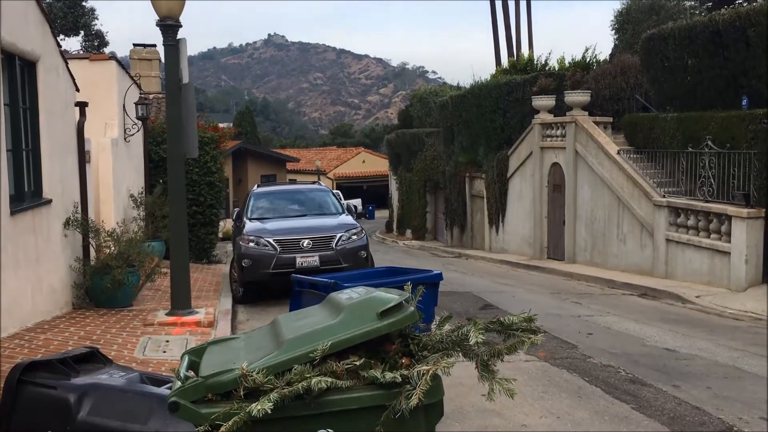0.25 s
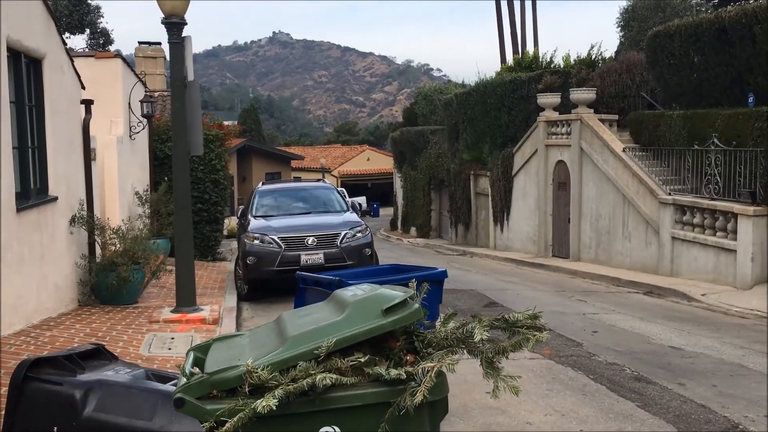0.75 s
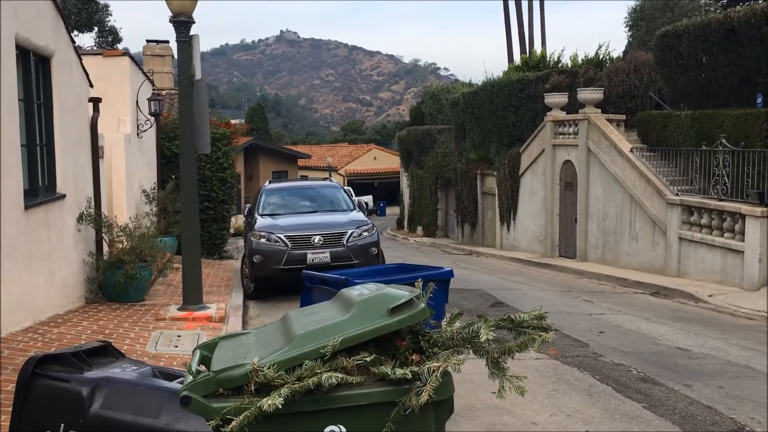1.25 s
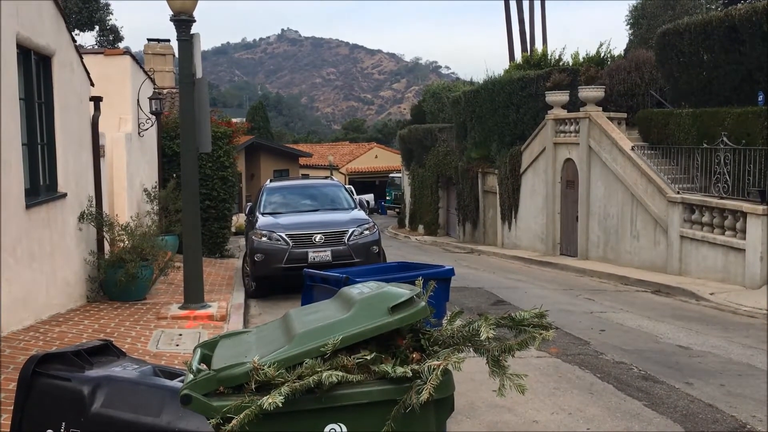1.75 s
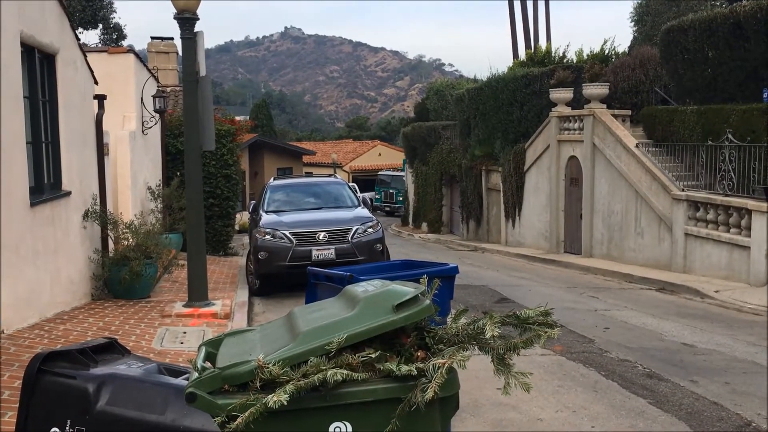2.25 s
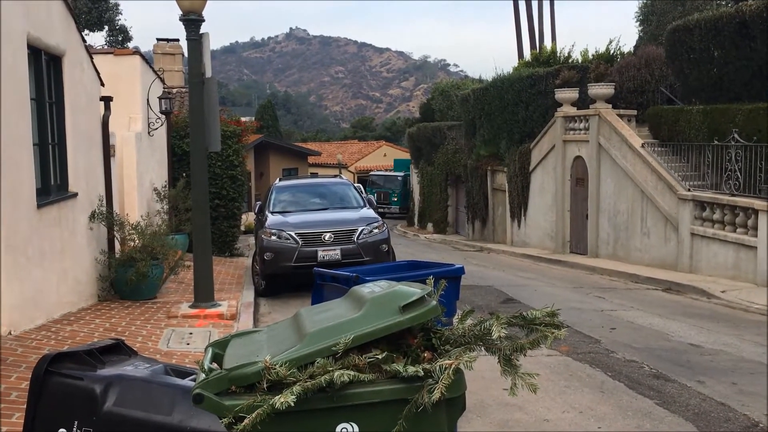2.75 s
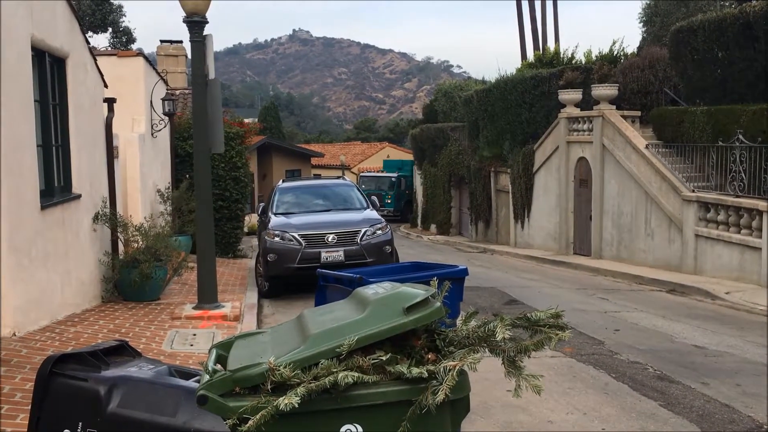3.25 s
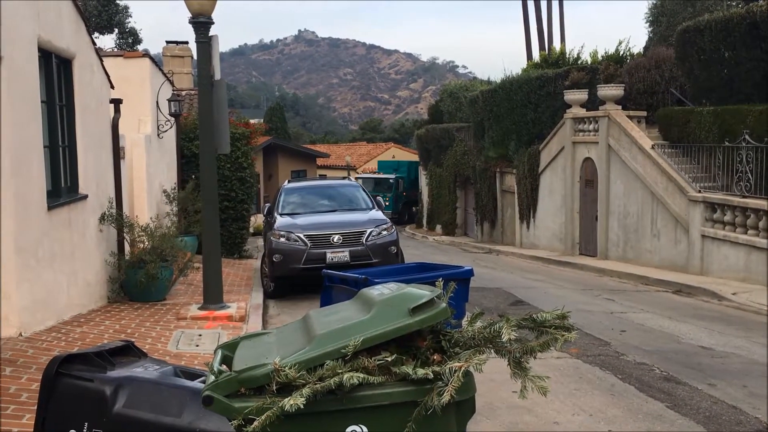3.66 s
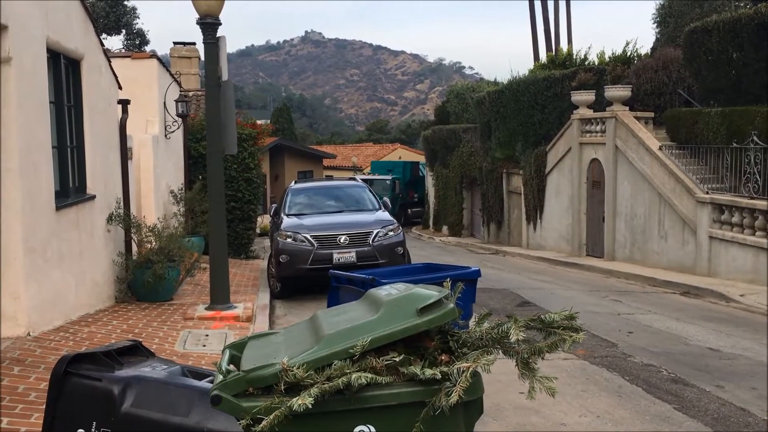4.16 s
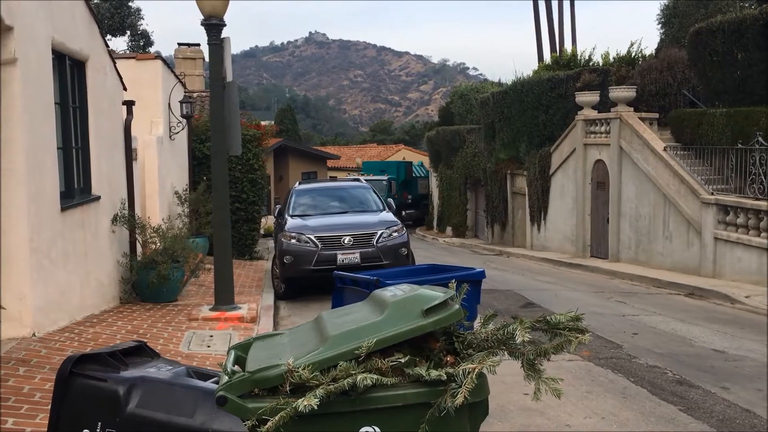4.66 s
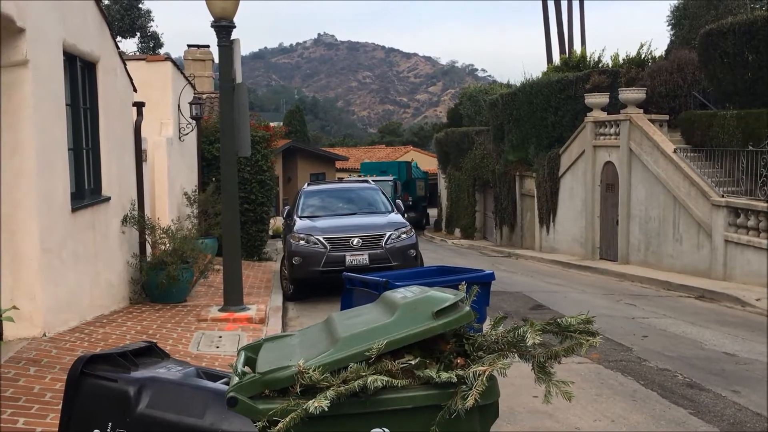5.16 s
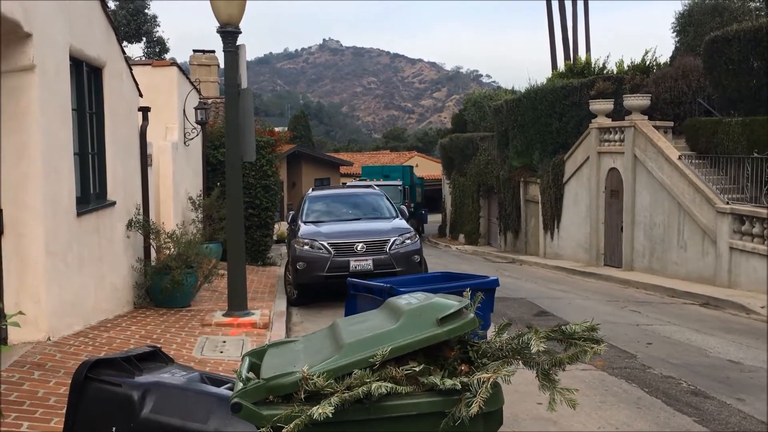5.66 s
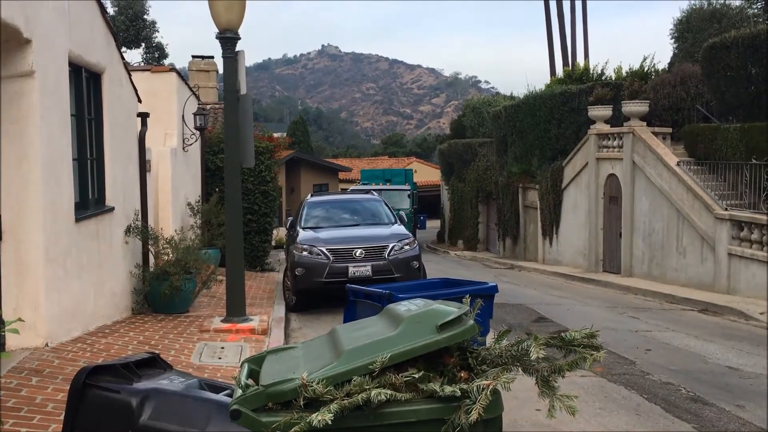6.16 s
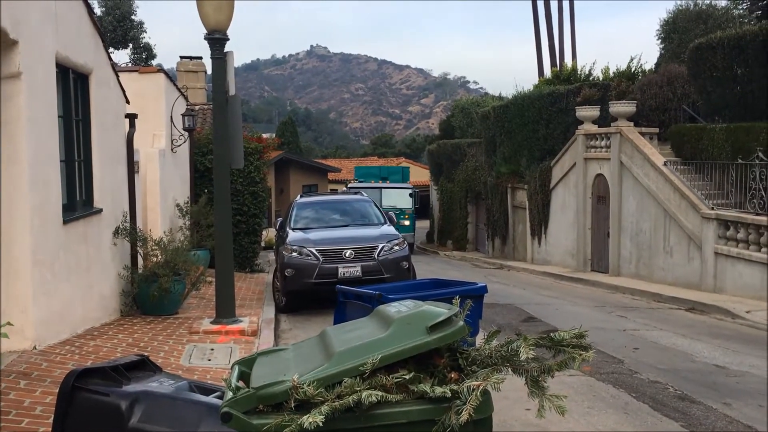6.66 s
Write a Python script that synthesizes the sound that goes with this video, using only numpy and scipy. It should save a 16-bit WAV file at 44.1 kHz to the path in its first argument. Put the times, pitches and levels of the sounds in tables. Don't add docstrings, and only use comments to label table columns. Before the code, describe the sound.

A phone microphone outdoors on a walled residential street picks up a heavy diesel truck coming uphill. From 0 s a low, steady engine drone around 60 Hz rumbles at a distance, with a wavering fan hum and soft airy roar. Dull body knocks land at 0-0.1 s and again near 0.45 s, where a short, thin, falling brake squeak sounds. Around 1.2 s a hollow boom between the walls swells slightly. Until 4 s the drone dips and swells, rising a little in pitch, with faint driveline whistles. At about 4.2 s the throttle opens: pitch climbs quickly to near 80 Hz by 5.4 s, with a very faint air puff at 4.4 s and slight turbo whine. The exhaust booms strongest around 5-6 s, its rapid flutter slowing into heavy throbs. Gear whine, roar and hiss grow as the truck nears, still running when it stops abruptly at 7 s.

```python
import sys
import numpy as np
from scipy import signal
from scipy.fft import rfft, irfft
from scipy.io import wavfile
from scipy.ndimage import uniform_filter1d, map_coordinates

SR = 44100
rng = np.random.default_rng(int(sys.argv[2]) if len(sys.argv) > 2 else 0)


def elevation(decibels):
    levels = np.asarray(decibels, float)
    return 10 ** (levels / 20)


def master_out(mix):
    frames = np.transpose(np.atleast_2d(mix))
    ceiling = np.clip(frames, -1, 1)
    pcm = np.round(ceiling * 32767).astype(np.int16)
    wavfile.write(sys.argv[1], SR, pcm)


N = 304290


def unit(x):
    return x / np.sqrt(np.mean(x ** 2) + 1e-20)


def seconds():
    return np.arange(N) / SR


def curves(rows):
    s, *cols = np.transpose(rows)
    return [np.interp(seconds(), s, c) for c in cols]


def swells(rows):
    t = seconds()
    return sum(db * np.exp(-.5 * ((t - s) / w) ** 2) for s, db, w in rows)


def wobble(rate_hz):
    coarse = np.arange(0, N + 64, 64)
    knots = rng.standard_normal(int(N * rate_hz / SR) + 4)
    return np.interp(np.arange(N), coarse, map_coordinates(knots, [coarse * rate_hz / SR]))


def turns(hz):
    return 2 * np.pi * np.cumsum(hz) / SR


def colour(points):
    f, db = np.transpose(points)
    return lambda hz: elevation(np.interp(np.log(hz + 1), np.log(f + 1), db))


def noise(gain, patchy_db):
    hz, _, z = signal.stft(rng.standard_normal(N + SR), SR, nperseg=2048)
    field = uniform_filter1d(rng.standard_normal(z.shape), size=10, axis=0)
    field = uniform_filter1d(field, size=4, axis=1)
    z = z * elevation(patchy_db * unit(field)) * gain(hz)[:, None]
    x = signal.istft(z, SR, nperseg=2048)[1]
    return unit(x[SR // 2:][:N])


def tone(phase, db, blur_rad, rate_hz, shake_db):
    level = np.sqrt(2) * elevation(db + shake_db * wobble(rate_hz))
    return level * np.cos(phase + blur_rad * wobble(rate_hz))


# (time [s], firing rate [Hz])
FIRING = [(0.0, 60.5), (0.5, 61.13), (1.0, 62.33), (1.5, 61.43), (2.0, 62.9), (2.5, 63.94), (3.5, 66.13),
          (4.0, 66.13), (4.2, 67.67), (4.4, 69.65), (4.6, 73.44), (4.8, 76.1), (5.0, 77.93), (5.4, 79.9),
          (5.8, 80.4), (6.2, 81.7), (6.6, 82.67), (6.9, 82.9)]


def firing_rate():
    return curves(FIRING)[0]


# (time [s], level [dB])
BOOM = [(0, -27.5), (.6, -28.5), (1.1, -28.5), (1.5, -26), (2.0, -30.5), (2.6, -25.5), (2.95, -26),
        (3.3, -29.5), (3.8, -21.5), (4.3, -25), (4.6, -22), (4.85, -18.5), (5.08, -14.5), (5.36, -17.5),
        (6.02, -14.5), (6.43, -20.5), (6.6, -17), (6.9, -20.5)]
# (time [s], rate [Hz])
FLUTTER = [(4.2, 54.97), (4.6, 48.51), (5.05, 32.74), (5.3, 25.94), (5.55, 23.42), (6.0, 21.98),
           (6.36, 15.56), (6.6, 16.49), (6.9, 14.13)]
# (time [s], depth [dB], width [s])
CANCELS = [(.14, 3, 0.02), (.84, 10.5, 0.077), (1.1, 8, .05), (1.28, 9, .04), (1.68, 10, 0.027),
           (2.16, 4, 0.055), (2.41, 4, .04), (2.59, 10, 0.059), (2.78, 6, .05), (3.18, 2.5, 0.03),
           (4.38, 12, 0.027)]


def exhaust(firing_hz):
    throttle_s, rise_s = 4.254, 0.25
    load = np.clip((seconds() - throttle_s) / rise_s, 0, 1)
    rate_hz, = curves(FLUTTER)
    beat = turns(rate_hz) + 3.3
    fast = rate_hz / 50
    low_db = -9 - 29 * fast ** 4.3
    high_db = -13.5 - 6.5 * fast ** 4
    lower = elevation(low_db + 1.2 * wobble(20)) * np.exp(-1j * beat)
    upper = elevation(high_db + 0.83 * wobble(14)) * np.exp(1j * beat)

    sharp_db = -12 - 2.3 * (rate_hz - rate_hz.min())
    skewed = 2 * beat - 1
    second = elevation(sharp_db + 1.5 * wobble(7.7)) * (np.exp(-1j * skewed) + 0.6 * np.exp(1j * skewed))
    flutter = 1 + load * (lower + upper + second)

    boom_db = curves(BOOM)[0] - swells(CANCELS) + 0.22 * wobble(11)
    boom = np.sqrt(2) * elevation(boom_db) * np.real(flutter * np.exp(1j * (turns(firing_hz) + 1.91)))
    gust_colour = colour([(12, -32), (28, -5.5), (45, 4), (70, -1.5), (110, -14), (160, -120)])
    return boom + load * elevation(-38) * noise(gust_colour, patchy_db=2.5)


def shaft_phase(firing_hz):
    lead, = curves([(.5, 1), (.9, 1.012), (1.35, 1), (4.15, 1), (4.3, 1.012), (4.6, 1.008),
                    (5, 1.008), (5.2, 1.002)])
    return turns(firing_hz * lead / 3)


# (time [s], level [dB], beat depth [0-1])
FAN = [(0, -37, 0.15), (.5, -42, 0.63), (1.2, -40, 0.5), (1.5, -40.5, 0.24), (2.2, -39, .7),
       (2.5, -37.5, 0.3), (2.72, -34.5, 0.21), (3.1, -39, 0.31), (3.45, -41.5, 0.8), (3.9, -42, 0.01),
       (4.28, -40, 0.18), (4.4, -52, 0.4), (4.65, -40.5, 0.4), (4.9, -53, .8), (5.3, -51, .8),
       (5.56, -44.5, 0.14), (6.2, -45, .4), (6.9, -39.5, 0.69)]
# (time [s], beats passed [count])
FAN_BEATS = [(.03, -1), (1.0, 5), (1.68, 9), (1.89, 10), (2.41, 13), (3.12, 18), (3.75, 22), (4.7, 28),
             (6.47, 39), (6.7, 40), (6.87, 41)]


def fan(shaft):
    db, depth = curves(FAN)
    beating = 1 + np.clip(depth, 0, 1) * np.cos(2 * np.pi * curves(FAN_BEATS)[0])
    return beating * tone(10 * shaft, db + 1, blur_rad=.9, rate_hz=7, shake_db=1.5)


# (time [s], level [dB])
GEAR = [(0, -67), (1.9, -67), (2.2, -61), (4.2, -58), (4.5, -60), (4.7, -50), (5.15, -52), (5.35, -47.5),
        (5.71, -46.5), (5.79, -56), (6.9, -55)]
# (time [s], extra level [dB], width [s])
BITES = [(4.32, 11, .04), (4.93, 7, .04), (5.42, 3, .06), (5.97, 5, .03), (6.35, 3, .1), (6.73, 5, .03),
         (6.87, 5, .03)]


def timing_gear(shaft):
    db = curves(GEAR)[0] + swells(BITES) + 1.5
    return tone(68 * shaft, db, blur_rad=.6, rate_hz=20, shake_db=1.8)


# (multiple of shaft speed [ratio], quiet level [dB], loudest time [s], swell [dB], width [s])
ORDERS = [(4.0, -48, 5.4, 6, .8), (4.5, -51, 5.6, 9, .7), (4.5, -70, 1.3, 22, 1), (5.0, -60, 6.3, 13, .7),
          (6.0, -58, 3.5, 10, .8), (6.0, -70, 4.8, 25, .3), (6.5, -62, 1.2, 7, .8), (7.0, -60, 3.8, 11, .5),
          (7.0, -70, 6.6, 14, .5), (7.5, -64, 6.6, 18, .45), (7.5, -70, 3.2, 21, .9),
          (8.5, -75, 6.8, 28, .25), (9.0, -70, 5.7, 25, .45), (11.0, -67, 5.2, 21, .5),
          (12.0, -68, 5.8, 9, .8), (14.0, -62, 3.5, 9, .4), (14.0, -70, 5.6, 15, .4),
          (15.0, -65, 6.3, 14, .6), (20.0, -66, 6.65, 16, .5), (20.0, -70, 2.3, 17, 1)]


def crankshaft(shaft):
    out = np.zeros(N)
    for order, quiet_db, s, swell_db, width_s in ORDERS:
        db = quiet_db + swells([(s, swell_db, width_s)])
        out += tone(order * shaft, db, blur_rad=.6, rate_hz=2 + order // 4, shake_db=2.5)
    return out


# (start [s], end [s], start frequency [Hz], end frequency [Hz], level [dB])
WHISTLES = [(-.3, .7, 683, 690, -57), (2, 3.7, 638, 677, -52), (4.4, 5.2, 546, 570, -47),
            (4.9, 5.9, 562, 632, -49), (5.5, 7.2, 620, 655, -49), (2.1, 3, 470, 490, -50),
            (3, 4.4, 905, 930, -54), (4.2, 5.1, 925, 955, -49), (5.9, 7.4, 911, 955, -52),
            (4.4, 5.1, 1052, 1070, -48), (5.2, 5.9, 1070, 1090, -48), (5.6, 7.3, 1120, 1166, -47),
            (6.1, 7.3, 1995, 2110, -56), (6.25, 6.75, 1740, 1800, -46), (6.68, 7, 1680, 1745, -44)]


def driveline():
    t, out, fade_s = seconds(), np.zeros(N), 0.23
    for s0, s1, hz0, hz1, db in WHISTLES:
        hz, = curves([(s0, hz0), (s1, hz1)])
        rate_hz = 9 + round(hz0, -2) / 90
        fade = np.clip(np.minimum(t - s0, s1 - t) / fade_s, 0, 1) ** 2
        out += fade * tone(turns(hz), db - 2, blur_rad=1.2, rate_hz=rate_hz, shake_db=2.5)
    return out


# (time [s], gain [dB])
NEAR = [(0, 2), (.15, 1), (.79, 0.5), (1.9, 1.5), (2.8, 4.5), (4.15, 6.5), (4.5, 9), (5.3, 9), (6.2, 10),
        (6.5, 12), (6.9, 12.5)]
# (frequency [Hz], level [dB per Hz])
RUMBLE = [(15, -34), (25, -20), (40, -6.5), (60, 2.5), (90, -2.5), (130, -6), (170, -13), (250, -12.5),
          (330, -27), (500, -31), (700, -120)]
# (time [s], extra level [dB], width [s])
COUGHS = [(0, 5.5, 0.062), (.45, 0.5, 0.092), (4.1, 2.5, 0.37), (4.55, 4, 0.17), (5.3, 3, .05),
          (5.6, 5.5, 0.098), (6.9, 9.5, 0.079)]
# (frequency [Hz], level [dB per Hz])
BODY = [(170, -21.5), (290, -2.5), (311, -4.5), (416, -4.5), (499, -7.5), (546, -6.5), (768, -8),
        (1090, -5), (1240, -9.5), (1490, -11.5), (1770, -9), (2390, -16), (3200, -22.5), (4160, -51.5),
        (7040, -120)]
# (frequency [Hz], width [Hz], level [dB])
BAY = [(880, 71, -15), (1098, 53, -2.5), (1776, 290, -4.5)]
# (frequency [Hz], level [dB per Hz])
HISS = [(1530, -43.5), (2600, -6), (2930, -2.5), (3720, -2), (4880, -8.5), (6060, -7), (7930, -17),
        (9000, -18), (10500, -25.5), (12700, -30), (15600, -37.5)]
# (frequency [Hz], level [dB per Hz])
STREET = [(200, -120), (260, -6), (310, 1), (420, 0), (480, -7), (600, -120)]
# (time [s], level [dB], width [s])
CORNER = [
    (1.2, 5.5, 0.34),
]


def rush():
    near_db, = curves(NEAR)

    def bay(f):
        return sum(elevation(db) * w * f / np.abs(c * c - f * f + 1j * f * w) for c, w, db in BAY) ** 2

    rumble = elevation(-37.5 + swells(COUGHS) + 1.7 * wobble(4.13)) * noise(colour(RUMBLE), patchy_db=0.5)
    roar = noise(colour(BODY), patchy_db=0.74)
    roar = roar + elevation(-17 + 1.17 * near_db) * noise(bay, patchy_db=1)
    top = colour([(5000, -120), (7000, -2.5), (8500, 5), (10000, -2.5), (12000, -9.5), (15700, -19.5)])
    hiss = noise(colour(HISS), patchy_db=0.7) + elevation(-18.5) * noise(top, patchy_db=1.7)
    street_db = -50 - 0.43 * near_db + swells(CORNER) + wobble(1.5)
    street = elevation(street_db) * noise(colour(STREET), patchy_db=1.5)
    return rumble + street + elevation(-45 + 0.56 * near_db) * roar + elevation(-60 + near_db) * hiss


# (time [s], frequency [Hz], peak level [dB], t60 [s])
BUMPS = [(.03, 290, -33, 0.18), (0.059, 116, -27, 0.22), (0.121, 298, -34, 0.26), (.42, 170, -29.5, 0.23),
         (0.431, 346, -29.5, 0.12), (.49, 102, -26, 0.37), (4.151, 151, -36, .4)]


def bumps():
    t, out = seconds(), np.zeros(N)
    for s, hz, db, t60_s in BUMPS:
        age = np.clip(t - s, 0, 2)
        envelope = elevation(db - 60 * age / t60_s) * (1 - np.exp(-age / 0.0067))
        out += envelope * np.sin(2 * np.pi * hz * age + 0.35 * wobble(29.94))
    return out


# (time [s], length [s], start frequency [Hz], end frequency [Hz], level [dB], octave level [dB])
SQUEAKS = [
    (.04, .05, 5430, 5450, -83, 6),
    (.1, .05, 5450, 5480, -83, 6),
    (.443, .098, 5190, 5010, -57.5, -15),
]


def brake():
    t, out = seconds(), np.zeros(N)
    for s, length_s, hz0, hz1, db, octave_db in SQUEAKS:
        u = np.clip((t - s) / length_s, 0, 1)
        phase = turns(hz0 + (hz1 - hz0) * u) + 1.3 * wobble(150)
        level = elevation(db + 2.5 * wobble(70) - 8 * u)
        envelope = np.sqrt(np.abs(np.sin(np.pi * u))) * (u < 1)
        out += level * envelope * (np.sin(phase) + elevation(octave_db) * np.sin(2 * phase))
    return out


# (time [s], frequency [Hz], level [dB])
TURBO = [(0, 6250, -120), (4.1, 6250, -88), (4.3, 6497, -67), (4.7, 7330, -78), (5, 7560, -72),
         (5.5, 7570, -75), (5.9, 7480, -74), (6.7, 7495, -74), (6.9, 7540, -75)]


def turbo():
    hz, db = curves(TURBO)
    return tone(turns(hz), db - 2, blur_rad=1.2, rate_hz=75, shake_db=2.5)


# (time [s], level [dB], t60 [s])
PUFFS = [
    (4.425, -66, .2),
]


def air_valve():
    t, out = seconds(), np.zeros(N)
    air_colour = colour([(2000, -120), (4000, -12), (7000, 0), (11000, -4), (15500, -12)])
    air = noise(air_colour, patchy_db=1.5)
    for s, db, t60_s in PUFFS:
        age = np.clip(t - s, 0, 1)
        out += air * elevation(db - 60 * age / t60_s) * (1 - np.exp(-age / .006))
    return out


def scene():
    firing_hz = firing_rate()
    shaft = shaft_phase(firing_hz)
    engine = exhaust(firing_hz) + fan(shaft) + timing_gear(shaft) + crankshaft(shaft)
    mix = engine + driveline() + rush() + bumps() + brake() + turbo() + air_valve()
    return mix[None]


def low_pass(x):
    return signal.sosfilt(signal.butter(12, 15700, fs=SR, output="sos"), x)


# (frequency [Hz], width [Hz], depth [dB])
HOUSING = [(2946, 150, -4.5), (4890, 230, -3.5), (7950, 370, -1.5), (10400, 410, -4.5)]


def record(dry):
    hz = np.fft.rfftfreq(N, 1 / SR)
    dips_db = sum(db / (1 + (2 * (hz - c) / w) ** 2) for c, w, db in HOUSING)
    closing = np.clip((N - 1 - np.arange(N)) / (.004 * SR), 0, 1)
    mix = irfft(rfft(dry * closing) * elevation(dips_db), N)
    return low_pass(mix)


dry = scene()
out = record(dry)
master_out(out)
```